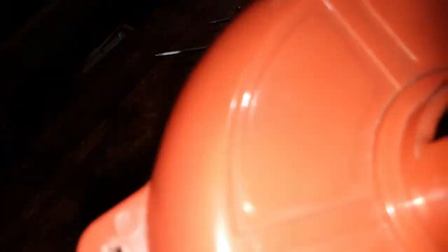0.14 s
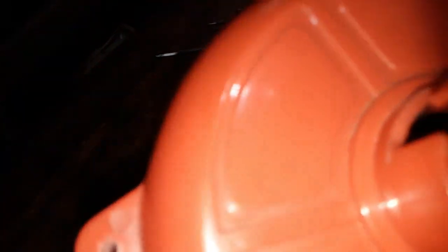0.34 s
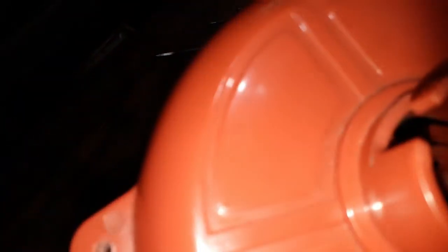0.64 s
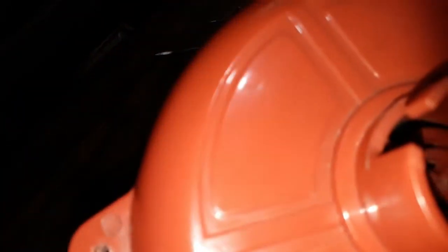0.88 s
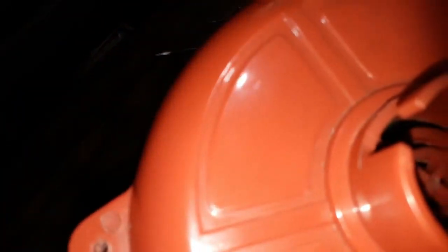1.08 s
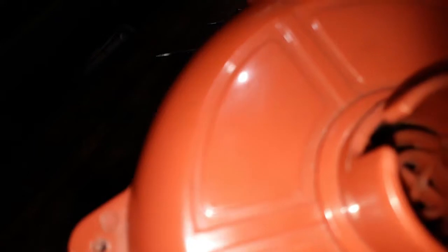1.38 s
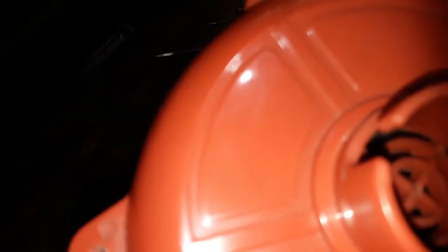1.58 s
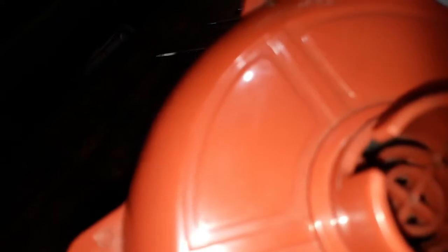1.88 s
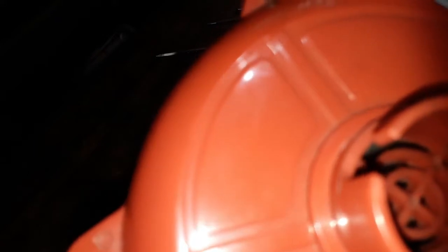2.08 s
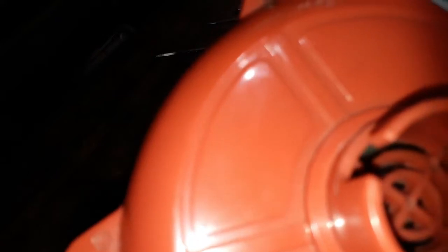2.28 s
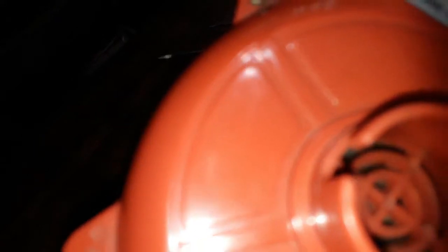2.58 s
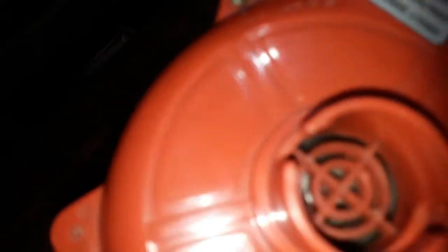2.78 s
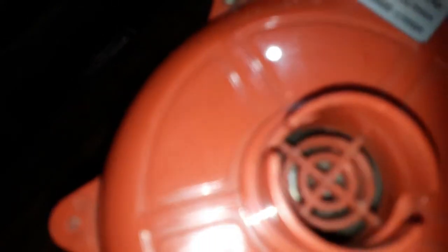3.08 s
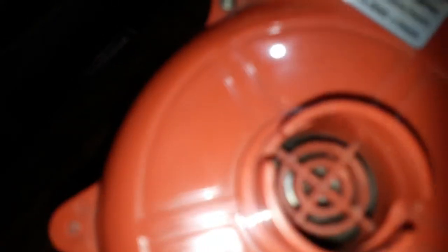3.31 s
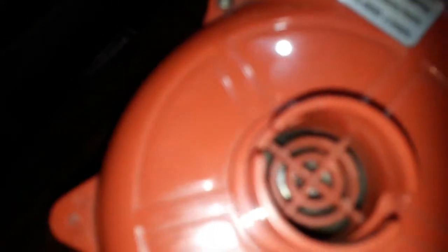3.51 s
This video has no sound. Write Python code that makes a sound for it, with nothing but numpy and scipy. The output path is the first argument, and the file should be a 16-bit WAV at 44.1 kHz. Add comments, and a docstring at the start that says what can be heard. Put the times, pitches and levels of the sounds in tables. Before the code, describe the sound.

A small electric blower coasts down very close to the microphone on a workbench; its rough drone and whine sink, airflow fades, and the rattle breaks into quieter single knocks in a small room.

```python
"""On a workbench, close by, a small electric blower coasts down.
Its loose rotor knocks in the plastic housing once a turn: a drone that falls apart into single beats.
The brushes scrape, rasp and squeak as coloured noise and tiny pulses, and the commutator bars whine as sines.
Fan rush, a blade tone, small ticks, a short room echo and a low background noise fill in the rest."""
import sys
import numpy as np
from scipy import signal
from scipy.fft import rfft, irfft, next_fast_len
from scipy.io import wavfile
from scipy.ndimage import map_coordinates

SR = 44100
rng = np.random.default_rng(int(sys.argv[2]) if len(sys.argv) > 2 else 0)


def store_pcm(level_fs):
    """Save levels as 16-bit WAV."""
    pcm = np.round(np.clip(level_fs, -1, 1) * 32767).astype(np.int16)
    wavfile.write(sys.argv[1], SR, np.atleast_2d(pcm).T)


N = 160965  # length in samples

# All levels in the tables are relative: the settings below them and the mix scale them further.
# Colour of the room background: pitch_hz, level_db
BACKGROUND_COLOUR = [(25, -17), (50, -21), (80, -9.5), (120, -28), (165, 4), (210, -1), (350, 5),
                     (700, -10), (2000, -42), (15000, -37)]
# Slowing of the shaft: time_s, speed_turns_per_s
SHAFT_SPEED = [(0.0, 92.6), (0.2, 85.03), (0.45, 76.98), (0.7, 69.8), (1.0, 62.24), (1.3, 55.58),
               (1.6, 49.92), (1.9, 44.46), (2.2, 39.38), (2.55, 33.33), (2.9, 28.38), (3.25, 23.6),
               (3.65, 18.11)]
# Colour of the air rushing through the fan: pitch_hz, level_db
AIR_COLOUR = [(25, -56), (50, -40), (78, -21), (140, -12), (330, -5), (550, -0.5), (870, -2.5),
              (1030, -11.5), (1250, -2), (1450, -16.5), (1800, -8), (4000, -25.5), (15000, -28.5)]
# Resonances of the air outlet: pitch_hz, width_hz, level_db
OUTLET_MODES = [(670, 42, -2.5), (855, 25, 0.5)]
# Sharp ticks of the housing: start_s, level_db, brightness_db_per_octave
HOUSING_TICKS = [(3.121, -24.5, -11), (3.4862, -22.5, 2.5)]
# Ringing modes of a tick: pitch_hz, level_db, fall_by_60_db_s
TICK_RINGS = [(1455, -6, 0.023), (2360, 1.5, 0.016), (3230, -3.5, 0.011)]
# Brush squeaks, each once a turn: shaft_angle_turns, pitch_hz, level_db
BRUSH_SQUEAKS = [(.38, 8100, -2), (.47, 9000, 1.5)]
# Loudness of the squeaks over time: time_s, level_db
SQUEAK_LEVEL = [(1.0, -59), (1.6, -36.5), (2.55, -42.5), (2.75, -49)]
# Rough patches that rasp under the brushes: shaft_angle_turns, width_turns, level_db
ROUGH_PATCHES = [(0.94, 0.013, -3.5), (0.42, 0.076, -6.5)]
# Colour of the rasp: pitch_hz, level_db
RASP_COLOUR = [(500, -35), (3000, -4), (6000, -7), (7800, -5), (8600, -0.5), (10500, -5), (12500, -13),
               (15700, -10)]
# Loudness of the rasp over time: time_s, level_db
RASP_LEVEL = [(0, -25), (1, -33.5), (1.6, -40.5), (2.4, -36.5), (2.8, -35.5), (3.6, -77)]
# Loudness of the brushes over time, also used for the whine: time_s, level_db
BRUSH_LEVEL = [(0.0, -29.5), (0.03, -28), (1.56, -34.5), (1.68, -35), (3.63, -41.5), (3.65, -42)]
# Stretches of a turn where the brushes press harder: shaft_angle_turns, width_turns, level_db
BRUSH_DRAGS = [(.41, 0.025, -4.5), (.56, 0.022, -13.5), (.82, 0.099, -2)]
# High resonances of the housing: pitch_hz, width_hz, level_db
HOUSING_MODES = [(1263, 26, -6.5), (1666, 140, -1.5), (2507, 260, -0.5), (2955, 156, 3), (4010, 290, -4),
                 (5285, 42, 0), (5690, 240, -3), (7040, 250, -7), (8640, 230, -8.5), (10620, 390, -12)]
# Broad colour of the scraping: pitch_hz, level_db
SCRAPE_COLOUR = [(100, -23), (500, -37.5), (1000, -24.5), (1600, -6), (3000, -12.5), (4800, -7),
                 (7700, -14), (10000, -13.5), (12500, -21), (15700, -28.5)]
# Tones of the commutator whine: multiple_of_bar_rate, level_db
WHINE_TONES = [(3, -4), (4, 4), (5, -2.5), (6, -4.5), (7, -4.5), (8, -5.5), (10, -9), (12, -11)]
# Resonances of the motor's metal can: pitch_hz, width_hz, level_db
CAN_MODES = [(2480, 110, 1.5), (2950, 130, 1), (3270, 90, -3), (3970, 220, 2), (4780, 180, -8),
             (5350, 250, -10), (7250, 470, -12), (8320, 660, -11), (10500, 900, -10)]
# Broad colour of the can: pitch_hz, level_db
CAN_COLOUR = [(100, -70), (2000, -38), (4500, -17), (15000, -24)]
# Ring of the casing when the rotor grazes it: pitch_hz, width_hz, level_db
GRAZE_MODES = [(1258, 28, 2), (1686, 300, -4.5)]
# Broad colour of a graze: pitch_hz, level_db
GRAZE_COLOUR = [(300, -34), (1500, -18), (3000, 0), (8000, -35)]
# Loudness of the knocking over time: time_s, level_db
KNOCK_LEVEL = [(0.03, -18), (0.45, -21.5), (0.9, -23.5), (1.3, -23), (1.55, -27), (1.7, -26), (2.2, -27),
               (2.5, -29), (2.62, -33), (2.74, -32.5), (2.79, -44), (3.3, -43.5), (3.6, -51.5)]
# Low resonances of the casing: pitch_hz, width_hz, level_db
CASING_MODES = [(167.5, 30, -15), (332.2, 52.4, 1.5), (392, 110, -9), (464.6, 50, -6), (535.6, 24, -7),
                (663, 35, -10.5), (863, 23, -14.5), (1285, 125, -21)]
# Broad, dead thud of a knock: pitch_hz, level_db
THUD_COLOUR = [(30, -62), (100, -48), (215, -13), (300, -23), (420, -10.5), (600, -22), (950, -38),
               (2000, -47), (8000, -65)]
# Harder knocks of the slowing rotor, timed at the light touch before the strike: touch_s, level_db
HARD_BUMPS = [(2.763, -17), (2.78, -23), (2.829, -21.5), (2.863, -20.5), (2.898, -19.5), (2.934, -22.5),
              (2.97, -22.5), (3.008, -22.5), (3.045, -24), (3.081, -27.5), (3.12, -35), (3.201, -21.5),
              (3.242, -28)]

START_TURN, FULL_HZ = -.36, 85.7  # first shaft angle (turns); reference speed (turns per s)
BACKGROUND_DB, ROOM_DB, ROOM_T60_S = -49, -9.5, .28  # T60: time for the echo to fall by 60 dB
AIR_DB, AIR_DB_PER_DOUBLING = -26.5, 17  # per doubling of shaft speed, as below
BLADES, BLADE_DB, BLADE_DB_PER_DOUBLING = 10, -29.5, 17
SCRAPE_DB, HISS_DB, DULL_DB = -7, -3, -5.5  # DULL: top treble lost towards standstill
BARS, WHINE_DB, WHINE_DB_PER_DOUBLING = 12, -9.5, 1
GRAZE_DB, GRAZE_LEAD_S, GRAZE_S = -15, 0.00341, 0.00291  # level, lead to its middle, length
KNOCK_DB, KNOCK_SCATTER_DB, KNOCK_JITTER_S = -2.5, 1.48, .00008
ROCK_ABOVE_HZ, ROCK_RANGE_HZ = 53.3, 7.6  # rocking starts here and is full this much faster (turns per s)
ROCK_S, ROCK_CHANCE = 0.00034, .35  # time shift to either side; random share of it
LEAD_S, LEAD_DB = 0.002733, -10.5  # light touch just before each strike
CRITICAL_HZ, CRITICAL_WIDTH_HZ = 39, 5  # shaft speed where the whirl changes sides (turns per s)
BASS_HZ, SOFT_HZ = 128, 1280  # casing radiates little below; contact too soft for much above
BUMP_DB = 18.5
TOP_HZ = 15700


def amp(db):
    """Turn decibels into a gain."""
    return 10 ** (np.asarray(db) / 20)


def unit(x):
    """Scale a sound to an rms of 1."""
    return x / np.sqrt(np.mean(x ** 2) + 1e-20)


def curve(rows):
    """Draw straight lines through (time, value) rows, one value per sample."""
    return np.interp(np.arange(N) / SR, *np.transpose(rows))


def colour(points, hz):
    """Join (pitch, level) points into a gain along a log pitch axis."""
    f, db = np.transpose(points)
    return amp(np.interp(np.log(hz + 1), np.log(f + 1), db))


def body(modes, broad):
    """Make the ring of a struck body, energy 1: resonances standing on a broad colour."""
    hz = np.fft.rfftfreq(2 ** 13, 1 / SR)
    power = colour(broad, hz) ** 2
    for centre, width, db in modes:
        damping = (hz * width) ** 2
        peak = damping / ((centre ** 2 - hz ** 2) ** 2 + damping)
        skirt = 1 + ((hz - centre) / centre * 2) ** 2  # narrows the foot of the peak
        power = power + amp(db) ** 2 * peak / skirt
    # Folding the cepstrum gives minimum phase: the ring starts at once, never before the blow.
    cepstrum = irfft(np.log(power) / 2)
    cepstrum[1:len(hz) - 1] *= 2
    cepstrum[len(hz):] = 0
    ring = irfft(np.exp(rfft(cepstrum)))
    return ring / np.linalg.norm(ring)


def through(x, ring):
    """Let a sound set off a ring at every sample (convolution)."""
    return signal.fftconvolve(x, ring)[:N]


def filtered(x, gain):
    """Multiply the spectrum of a sound by a gain that depends on pitch."""
    m = next_fast_len(N + SR // 2)
    return irfft(rfft(x, m) * gain(np.fft.rfftfreq(m, 1 / SR)), m)[:N]


def noise(points):
    """Make coloured noise with an rms of 1."""
    return unit(filtered(rng.standard_normal(N), lambda hz: colour(points, hz)))


def wobble(rate):
    """Draw a smooth random curve with `rate` random points a second."""
    return map_coordinates(rng.standard_normal(2 ** 12), [np.arange(N) * rate / SR], mode="wrap")


def pulses(times, sizes):
    """Place clicks at exact times, even between samples, with a windowed sinc."""
    keep = (times > 0) & (times < N / SR)
    at = times[keep, None] * SR
    i = np.floor(at).astype(int) + np.arange(-7, 9)
    taps = sizes[keep, None] * np.sinc(i - at) * np.sinc((i - at) / 8)
    return np.bincount(np.clip(i, 0, N).ravel(), taps.ravel(), N + 1)[:N]


def passing(turn, angle, width):
    """Swell briefly each time the shaft passes an angle."""
    distance = (turn - angle + .5) % 1 - .5
    return np.exp(-.5 * (distance / width) ** 2)


def doublings(speed):
    """Count how many times the speed has doubled from the reference; negative when slower."""
    return np.log2(speed / FULL_HZ)


def background():
    """The steady, low noise of the room."""
    return amp(BACKGROUND_DB) * noise(BACKGROUND_COLOUR)


def room(x):
    """A short answer from the bench and the walls: a fading burst of noise as echo."""
    t = np.arange(SR // 2) / SR
    fade = amp(-60 * t / ROOM_T60_S)
    tail = rng.standard_normal(len(t)) * fade * (t > .004)  # the first echo comes after 4 ms
    return through(x, tail / np.linalg.norm(tail))


def air(speed):
    """The rush of the fan, a noise that dies away quickly with its speed."""
    level_db = AIR_DB + AIR_DB_PER_DOUBLING * doublings(speed) + 1.2 * wobble(24.95)
    return noise(AIR_COLOUR) * amp(level_db)


def fan(speed, turn):
    """The blade tone falls and fades with the speed, swelling in the resonances of the outlet."""
    hz = BLADES * speed
    gain = sum(amp(db) / np.hypot(1, 2 * (hz - centre) / width) for centre, width, db in OUTLET_MODES)
    level_db = BLADE_DB + BLADE_DB_PER_DOUBLING * doublings(speed) + 2.2 * wobble(7)
    return gain * np.sin(2 * np.pi * BLADES * turn) * amp(level_db)


def ticks():
    """Small hard contacts ring briefly; a softer one rings mainly the lowest mode."""
    t = np.arange(SR // 10) / SR
    at, level, tilt = np.transpose(HOUSING_TICKS)
    rise = 1 - np.exp(-t / 0.0008)
    lowest_hz = TICK_RINGS[0][0]
    sound = np.zeros(N)
    for hz, db, t60 in TICK_RINGS:
        clicks = pulses(at, amp(level + tilt * np.log2(hz / lowest_hz)))
        ring = rise * amp(db - 60 * t / t60) * np.sin(2 * np.pi * hz * t)
        sound += through(clicks, ring)
    return sound


def squeaks(turn, width_turns, spread_hz):
    """A brush chirps twice a turn, the second time higher: narrow noise opened at set shaft angles."""
    chirps = np.zeros(N)
    for angle, hz, db in BRUSH_SQUEAKS:
        band = [(hz - spread_hz, -40), (hz, 0), (hz + spread_hz, -40), (2 * hz, -80)]
        chirps += amp(db) * passing(turn, angle, width_turns) * noise(band)
    return chirps * amp(curve(SQUEAK_LEVEL))


def rasp(turn, scatter_db):
    """A short bright burst of noise each time a rough patch passes a brush."""
    gate = sum(amp(db) * passing(turn, angle, width) for angle, width, db in ROUGH_PATCHES)
    return noise(RASP_COLOUR) * gate * amp(curve(RASP_LEVEL) + scatter_db * wobble(46))


def scrape(turn, count, scatter_db):
    """The same rough spots of the commutator pass under the brushes on every turn, as tiny clicks."""
    angles = (np.arange(count) + rng.random(count)) / count
    spots = angles + np.arange(-1, int(turn[-1]) + 1)[:, None]  # one row per turn
    size = rng.standard_normal(count) * amp(scatter_db * rng.standard_normal(spots.shape))
    times = np.interp(spots.ravel(), turn, np.arange(N) / SR, left=-1, right=-1)
    return pulses(times, size.ravel())


def brushes(speed, turn, steady_db, scatter_db):
    """Scrape and hiss ring the housing, in strokes where the brushes drag."""
    grit = unit(scrape(turn, count=260, scatter_db=2) / np.sqrt(speed))
    force = amp(SCRAPE_DB) * grit + amp(HISS_DB) * rng.standard_normal(N)
    drag = sum(amp(db) * passing(turn, angle, width) for angle, width, db in BRUSH_DRAGS)
    pressure = amp(steady_db) + drag * amp(scatter_db * wobble(70))
    sound = through(force * pressure * amp(curve(BRUSH_LEVEL)), body(HOUSING_MODES, SCRAPE_COLOUR))
    top = filtered(sound, lambda hz: 1 / (1 + (3500 / (hz + 1)) ** 6))
    dulling = amp(DULL_DB * (1 - speed / FULL_HZ) ** 2)
    return sound + top * (dulling - 1)


def whine(speed, turn, waver_db, flutter_db, shake_turns):
    """Harmonics of the bar rate flutter, and swell as they fall through each mode of the motor can."""
    shaken = turn + shake_turns * wobble(90)
    tones = np.zeros(N)
    for multiple, db in WHINE_TONES:
        level = amp(db + waver_db * wobble(12))
        tones += level * np.sin(2 * np.pi * (round(multiple) * BARS * shaken + rng.random()))
    fluttering = unit(tones * amp(flutter_db * wobble(250)))
    level_db = curve(BRUSH_LEVEL) + WHINE_DB + WHINE_DB_PER_DOUBLING * doublings(speed)
    return through(fluttering * amp(level_db), body(CAN_MODES, CAN_COLOUR))


def graze(at, size, count):
    """A short scuff of tiny contacts just ahead of each knock."""
    times = at[:, None] - GRAZE_LEAD_S + GRAZE_S * (rng.random((len(at), count)) - .5)
    sizes = size[:, None] * amp(GRAZE_DB) * rng.standard_normal(times.shape) / np.sqrt(count)
    return through(pulses(times.ravel(), sizes.ravel()), body(GRAZE_MODES, GRAZE_COLOUR))


def knocks(speed, turn):
    """Once a turn the whirling rotor grazes, then strikes the casing; at speed it rocks between two positions.
    Below its critical speed the whirl no longer lags the shaft by half a turn, and hard bumps stand out."""
    whirl = turn + .5 / (1 + np.exp((speed - CRITICAL_HZ) / CRITICAL_WIDTH_HZ))
    t, k = np.arange(N) / SR, np.arange(int(whirl[-1]) + 1)
    at = np.interp(k, whirl, t)
    rate = np.interp(at, t, speed)
    swing_luck, size_luck, time_luck = rng.standard_normal((len(k), 3)).T

    # Every other knock comes early or late while the rotor rocks.
    rock = np.clip((rate - ROCK_ABOVE_HZ) / ROCK_RANGE_HZ, 0, 1)
    swing = rock * ((-1.) ** k + ROCK_CHANCE * swing_luck)
    level_db = np.interp(at, *np.transpose(KNOCK_LEVEL)) + KNOCK_DB + KNOCK_SCATTER_DB * size_luck
    size = amp(level_db) * np.sqrt(SR / rate)  # fewer knocks a second, each one larger

    bump_s, bump_db = np.transpose(HARD_BUMPS)
    at = np.r_[at + ROCK_S * swing + KNOCK_JITTER_S * time_luck, bump_s + LEAD_S]
    size = np.r_[size, amp(bump_db + BUMP_DB)]
    blows = pulses(at, size) + pulses(at - LEAD_S, size * amp(LEAD_DB))
    sound = through(blows, body(CASING_MODES, THUD_COLOUR))
    thuds = filtered(-sound, lambda hz: 1 / (1 + (BASS_HZ / (hz + 1)) ** 4) / (1 + (hz / SOFT_HZ) ** 4))
    return thuds + graze(at, size, count=8)


def scene():
    """One shaft speed drives every turning part; the ticks and hard bumps have set times."""
    speed = curve(SHAFT_SPEED)
    turn = START_TURN + np.cumsum(speed) / SR
    blower = air(speed) + fan(speed, turn) + ticks()
    blower += squeaks(turn, width_turns=0.018, spread_hz=1400)
    blower += rasp(turn, scatter_db=2.5)
    blower += brushes(speed, turn, steady_db=-1.5, scatter_db=1.5)
    blower += whine(speed, turn, waver_db=1.8, flutter_db=2.5, shake_turns=.001)
    blower += knocks(speed, turn)
    return (background() + amp(ROOM_DB) * room(blower) + blower)[None]


def record(dry):
    """Keep only what lies below the top of the recorder's band."""
    return filtered(dry[0], lambda hz: hz < TOP_HZ)[None]


dry = scene()
out = record(dry)
store_pcm(out)
```